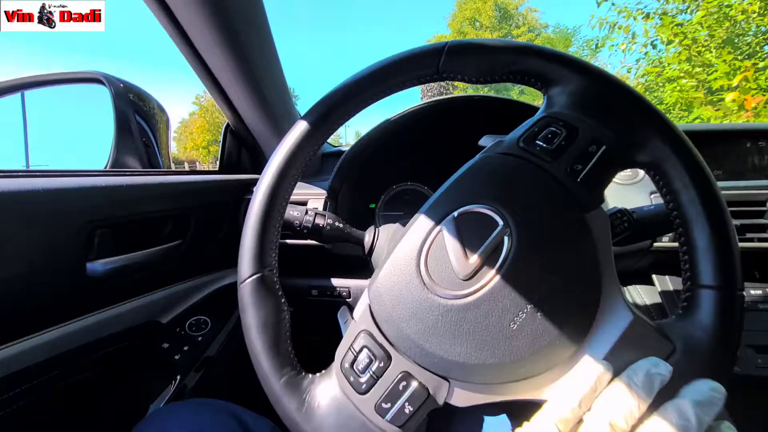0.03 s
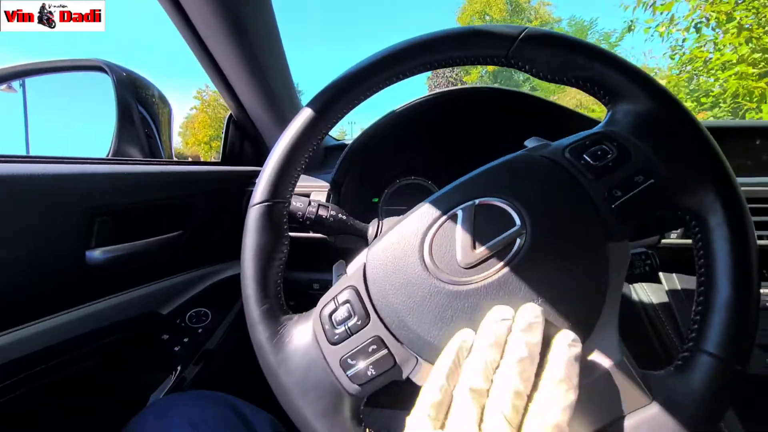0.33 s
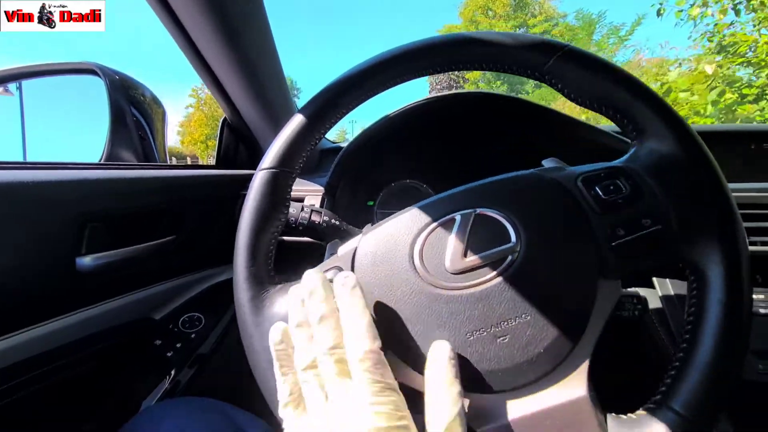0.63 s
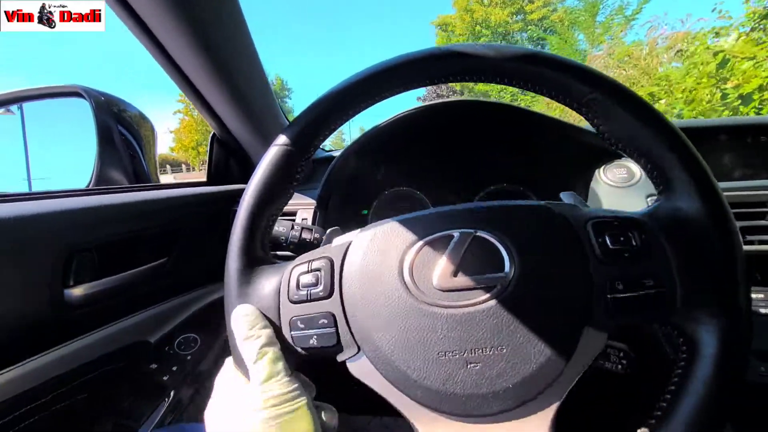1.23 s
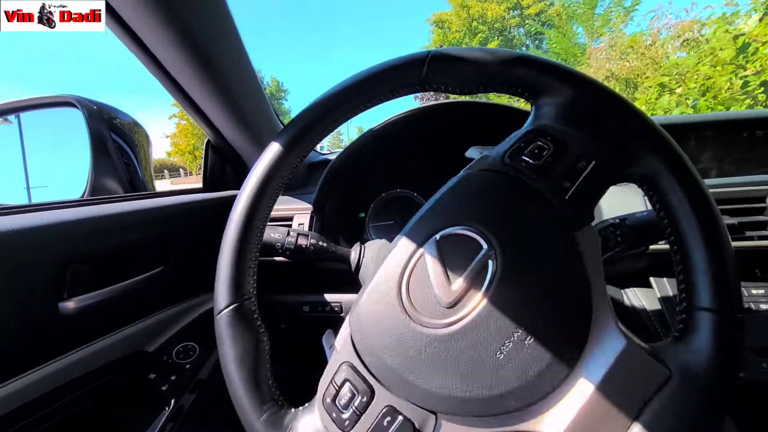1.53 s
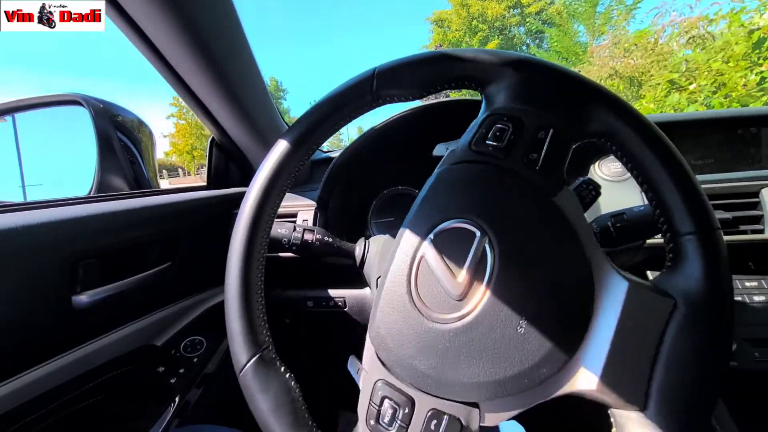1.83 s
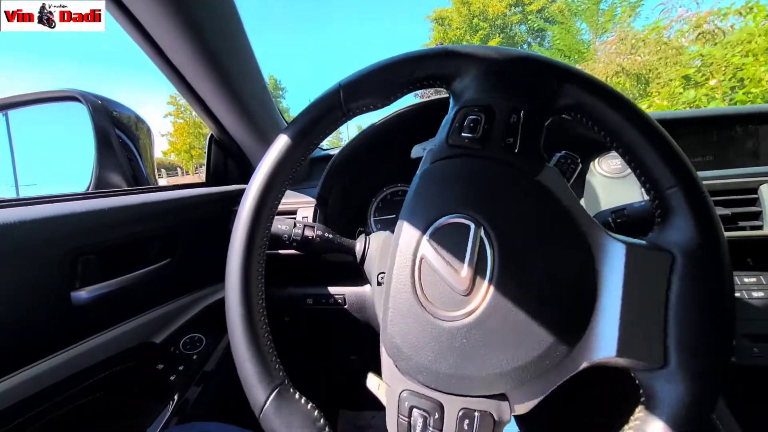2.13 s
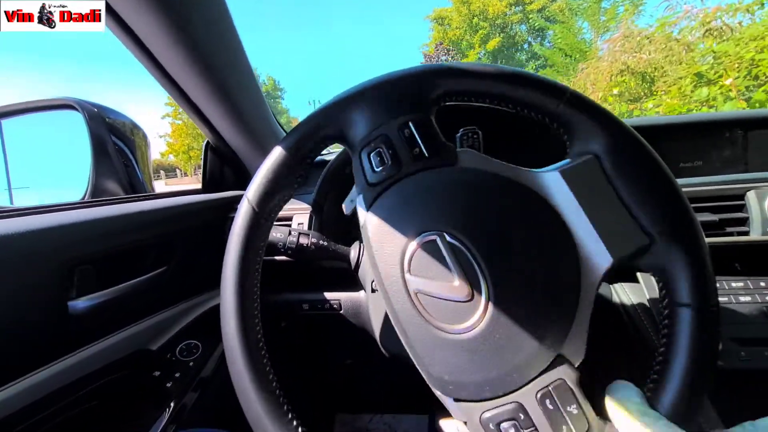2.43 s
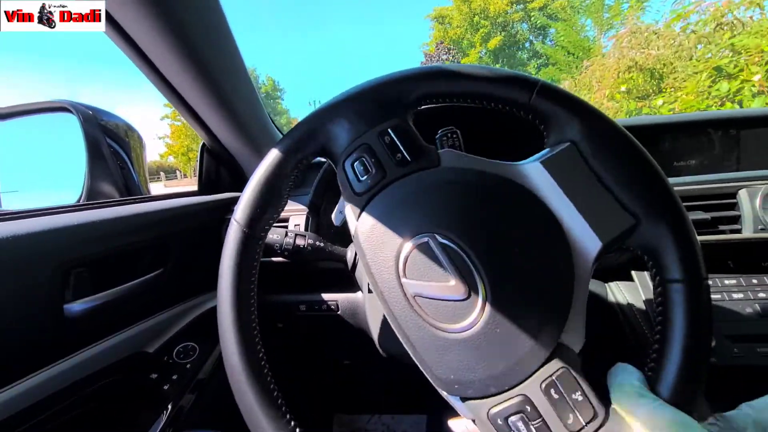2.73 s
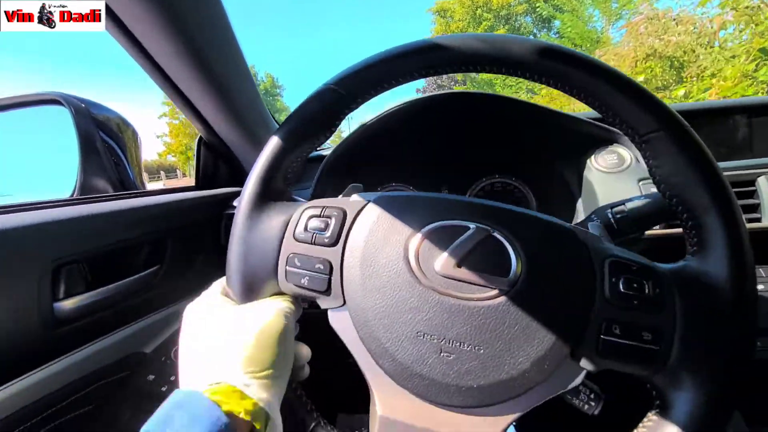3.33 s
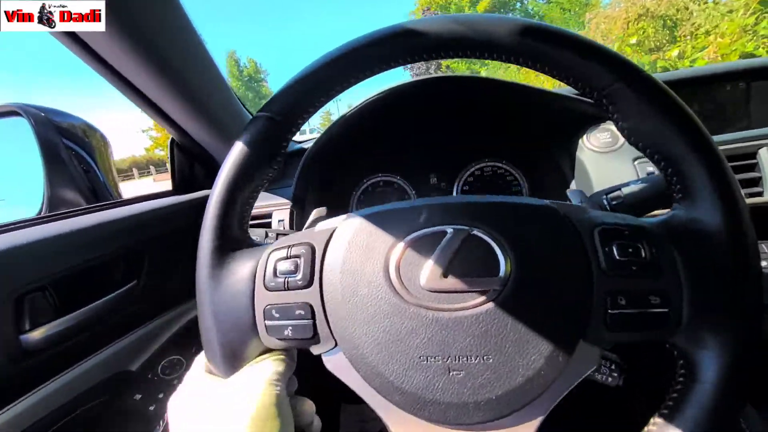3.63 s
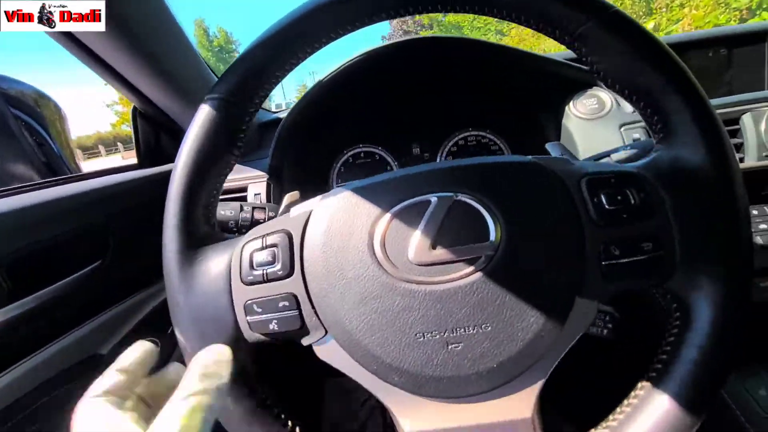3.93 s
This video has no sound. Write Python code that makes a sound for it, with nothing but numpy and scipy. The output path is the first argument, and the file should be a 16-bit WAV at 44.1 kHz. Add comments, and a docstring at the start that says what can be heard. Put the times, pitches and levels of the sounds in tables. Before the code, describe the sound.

A gloved palm rubs a steering wheel in short, soft swishes during the first second, with a low bump at the start. From about 1.3 seconds the rim slides through the glove in waves, with brief low steering groans. Around 3 seconds come a stronger slide, a tiny squeak and a tick, then a sharper click at 3.3. Low idling rumble and soft ventilation fill the car throughout.

```python
"""A gloved hand turns the steering wheel one way and back inside a closed, idling car.
Stick-slip friction makes the palm swish in short strokes, then the rim slide and squeak in the glove.
The steering bumps and groans; the column and trim tick and knock in quickly damped modes.
Underneath lie the engine's firing drone, the body's rumble and the rush and whine of the ventilation."""
import sys
import numpy as np
from scipy import signal
from scipy.fft import rfft, irfft
from scipy.io import wavfile
from scipy.ndimage import uniform_filter1d

SR = 44100
rng = np.random.default_rng(int(sys.argv[2]) if len(sys.argv) > 2 else 0)


def file_out(sig):
    """Save sig as 16-bit WAV at sys.argv[1]."""
    # one column per channel
    cols = np.atleast_2d(sig).T
    # limit, then scale
    lim = np.clip(cols, -1, 1)
    pcm = np.round(lim * 32767).astype(np.int16)
    wavfile.write(sys.argv[1], SR, pcm)


N = 176400
TIME_S, FREQ_HZ = np.arange(N) / SR, np.arange(N // 2 + 1) * SR / N
EARS = np.array([[1], [-1]])  # left, right

# Balance of the cabin's noise: frequency_hz, left_minus_right_db
CABIN_PAN = [(30,-4),(120,1),(350,0.5),(700,-3),(1300,-0.5),(2200,-3),(3000,-4),(4400,0),(8000,0),(15000,-11)]


def undb(db):
    """Decibels to amplitude ratio."""
    return 10 ** (np.asarray(db) / 20)


def unit(x):
    """Normalisation to rms 1."""
    return x / np.sqrt(np.mean(x ** 2))


def curve(rows):
    """Linear interpolation of (time_s, value) rows at every sample."""
    return np.interp(TIME_S, *np.array(rows).T)


def by_pitch(rows):
    """Interpolation of (frequency_hz, value) rows along log frequency."""
    hz, value = np.array(rows, float).T
    return np.interp(np.log(FREQ_HZ + 1), np.log(hz), value)


def phase_of(hz):
    """Phase is the time integral of frequency."""
    return 2 * np.pi * np.cumsum(hz) / SR


def walk(rate_hz):
    """Smoothed random steps of rms 1, for modulation."""
    step = int(SR / rate_hz)
    held = rng.standard_normal(N // 20)[np.arange(N) // step]
    return unit(uniform_filter1d(uniform_filter1d(held, step), step))


def swell(start, end, attack_s, release_s):
    """Amplitude envelope: a smooth rise near the start and fall near the end."""
    rise = 1 + np.tanh(2 * (TIME_S - start) / attack_s + 1)
    fall = 1 - np.tanh(2 * (TIME_S - end) / release_s - 1)
    return rise * fall / 4


def binaural(pair, spectrum, balance, lag_ms, diffuse_hz=600):
    """Interaural coherence: the ears share the bass, and the left lags in the treble; rms 1."""
    # Likeness of the two ears: frequency_hz, coherence
    likeness = [(30,0.8),(70,.95),(130,0.99),(280,0.77),(500,0.93),(900,0.17),(2000,0.33),(8000,0.02)]
    coherence = by_pitch(likeness)
    mid, side = rfft(pair)
    both = mid * np.sqrt(1 + coherence) + EARS * side * np.sqrt(1 - coherence)
    lag_s = lag_ms / 1000 * FREQ_HZ ** 2 / (FREQ_HZ ** 2 + diffuse_hz ** 2)
    delay = np.exp(-1j * np.pi * EARS * FREQ_HZ * lag_s)
    gain = undb(by_pitch(spectrum) + EARS * by_pitch(balance) / 2)
    return unit(irfft(both * delay * gain, N))


def engine(waver_db=2.16, pan_db=-1.1):
    """Periodic firing drives a fundamental and a booming second harmonic."""
    # Firing rate: time_s, rate_hz
    firing = [(0.0, 37.4), (0.11, 38.09), (0.67, 36.97), (0.86, 37.72), (1.34, 31.22), (1.59, 29.56),
              (1.71, 29.64), (2.15, 33.77), (2.91, 33.8), (3.25, 32.94), (3.61, 34.13), (4.0, 33.45)]
    # Fundamental and second harmonic: time_s, level_db
    fundamental = [(0,-38),(.35,-43),(.62,-30),(.9,-29.5),(1.15,-49),(1.75,-56),(1.95,-43.5),(3.1,-41),(3.6,-34),(4,-38)]
    boom = [(0,-47),(1.22,-43),(1.38,-39),(1.8,-37.5),(2.05,-49),(2.3,-40),(3,-36),(3.35,-41),(4,-39)]
    phase = phase_of(curve(firing))
    drone = sum(np.sqrt(2) * np.sin(harmonic * phase) * undb(curve(level) + waver_db * walk(18))
                for harmonic, level in enumerate((fundamental, boom), 1))
    return drone * undb(EARS * pan_db / 2)


def rumble():
    """The vibrating body radiates low-frequency noise into the cabin."""
    # Rumble spectrum: frequency_hz, relative_db
    spectrum = [(10,-21),(20,-1),(28,-2),(48,0),(70,-6),(85,-11.5),(125,-12.5),(160,-16.5),(195,-13),(250,-20),(330,-18),(420,-27),(700,-33),(900,-45),(2000,-88)]
    # Rumble strength: time_s, level_db
    level = [(0,-37),(.15,-35),(.35,-37.5),(.6,-37.5),(.9,-37.5),(1.2,-39),(2.5,-39),(4,-40.5)]
    return binaural(rng.standard_normal((2, N)), spectrum, CABIN_PAN, lag_ms=0.32) * undb(curve(level))


def ventilation(growth_db_per_s=2.0):
    """Turbulent air gives broadband noise; the blower adds a thin, growing tonal whine."""
    # Air spectrum: frequency_hz, relative_db
    spectrum = [(100,-2),(300,-1),(520,-1.5),(760,-4),(880,-10),(1060,-10),(1300,-4),(1800,-8.5),(2250,-16),(2900,-14.5),(4000,-18.5),(4700,-24),(8000,-28.5),(10000,-43),(15500,-46)]
    # Air strength: time_s, level_db
    level = [(0,-51),(1.1,-48.5),(2.1,-49.5),(2.7,-50),(3.4,-51.5),(4,-50.5)]
    # Blower tones: pitch_hz, final_level_db
    tones = [(309,-57.5),(935,-72)]
    air = binaural(rng.standard_normal((2, N)), spectrum, CABIN_PAN, lag_ms=0.49)
    air *= undb(curve(level) + .4 * walk(16))
    whine = 0
    for hz, db in tones:
        amplitude = np.sqrt(2) * undb(db + 1.55 * walk(6))
        whine += amplitude * np.sin(phase_of(hz * (1 + 0.00191 * walk(8))))
    return air + whine * undb(growth_db_per_s * (TIME_S - N / SR))


def wander(pair, depth_db=2.3, life_s=.08, width_hz=300):
    """Narrow resonances come and go as the hand changes shape."""
    spectra = signal.stft(pair, nperseg=512)[2]
    span = (1, round(width_hz * 512 / SR), round(life_s * SR / 256))
    patches = signal.fftconvolve(rng.standard_normal(spectra.shape), np.ones(span), mode="same")
    return signal.istft(spectra * undb(depth_db * unit(patches)), nperseg=512)[1][:, :N]


def friction(spectrum, grain, slips_per_s=5000, spread_db=2.6):
    """Stick-slip friction: dense tiny slips over a hiss, fluttering with the hand's pressure."""
    # Balance of the hand's noise: frequency_hz, left_minus_right_db
    balance = [(300,5),(750,0),(1200,-2.5),(1600,-12),(2200,2),(3000,-3.5),(4500,-2.5),(6500,3.5),(9000,3),(11500,1),(14000,8.5)]
    sizes = undb(spread_db * np.minimum(rng.exponential(size=N), 6))
    slips = (rng.random(N) < slips_per_s / SR) * sizes * rng.standard_normal((2, N))
    contact = wander(rng.standard_normal((2, N)) + grain * unit(slips))
    flutter = undb(.7 * walk(180))
    return binaural(contact, spectrum, balance, lag_ms=0.249) * flutter


def palm(pivot_hz=6000, half_width_octaves=0.065, arch_db=3.5):
    """Cavity resonance: the hollow of the hand colours each bright swish of friction anew."""
    # Glove on the wheel: frequency_hz, relative_db
    spectrum = [(400,-33),(700,-5),(1000,-11),(1500,-8.5),(2300,-1),(3100,4),(4500,-1.5),(5400,-1),(6500,-2.5),(8500,-2),(10000,-5.5),(12000,-5.5),(15500,-8)]
    # Palm strokes: start_s, end_s, level_db, tilt_db_per_octave, resonance_hz, lift_db
    strokes = [(-.05,0.038,-52.5,4,3570,10),(.062,0.143,-45,1,3430,6),(0.138,0.182,-49,0,3900,6.5),(0.179,0.246,-49.5,-1.5,3240,1.5),(0.333,0.41,-56,-3.5,3200,-2),(0.396,.475,-50,5,4000,9),(0.654,0.741,-47,2,2970,4),(0.773,0.852,-55.5,2,6600,10.5),(0.86,0.965,-56,0,7600,8),(3.1,3.135,-53.5,-4.5,3197,1)]
    rub, out = rfft(friction(spectrum, grain=0.68)), 0
    freq = np.maximum(FREQ_HZ, 500)  # the tilt levels off in the bass
    for start, end, db, tilt, hz, lift in strokes:
        resonance_db = lift / (1 + (np.log2(freq / hz) / half_width_octaves) ** 2)
        swish = irfft(rub * undb(db + tilt * np.log2(freq / pivot_hz) + resonance_db), N)
        progress = np.clip((TIME_S - start) / (end - start), 0, 1)
        arch = undb(arch_db * (np.sin(np.pi * progress) - .5))  # loudest in mid-stroke
        out += swish * arch * swell(start, end, attack_s=0.021, release_s=0.032)
    return out


def rim():
    """Sliding friction: the rim hisses in the glove, dull under a tight grip, bright at fingertips."""
    # Sliding, louder as the wheel turns faster: time_s, level_db
    slide_level = [(0,-51.5),(.55,-64),(.85,-53.5),(1.03,-60.5),(1.22,-62.5),(1.42,-51.5),(1.58,-52),(1.68,-57.5),(1.88,-53.5),(2.02,-61),(2.25,-52.5),(2.48,-53.5),(2.63,-64),(2.85,-48),(3.06,-52),(3.16,-54.5),(3.3,-65),(3.76,-65),(3.86,-51),(4,-59.5)]
    # Tight grips and fingertip brushes: start_s, end_s, level_db
    grips = [(0.062,0.09,-50.5),(1.302,1.846,-60.5),(2.22,2.503,-54.5),(2.792,2.948,-48.5)]
    brushes = [(1.44,1.56,-67),(1.53,1.62,-61.5),(1.575,1.593,-59),(3.012,3.025,-52.5)]
    # Spectrum of each contact: frequency_hz, relative_db
    slide_spectrum = [(300,-7),(700,-0.5),(1000,-1.5),(1400,-4.5),(1900,5),(2400,1.5),(3300,0.5),(4600,-5.5),(6500,-4),(8500,-6.5),(10000,-12),(15500,-17.5)]
    grip_spectrum = [(300,-2.5),(700,-2.5),(1000,-3.5),(1300,3.5),(1800,-4.5),(2300,-7.5),(3000,-15),(5000,-30.5),(15000,-32)]
    brush_spectrum = [(2000,-25),(6000,-3),(10000,0),(13000,-6),(15500,-3)]
    grip = sum(undb(db) * swell(start, end, .07, 0.035) for start, end, db in grips)
    brush = sum(undb(db) * swell(start, end, 0.017, 0.012) for start, end, db in brushes)
    return (undb(curve(slide_level)) * friction(slide_spectrum, grain=0.31)
            + grip * friction(grip_spectrum, grain=1.0)
            + brush * friction(brush_spectrum, grain=.8))


def steering():
    """Low vibrations glide downward: bumps as the palm pushes, groans as the wheel reverses."""
    # Bumps and groans: start_s, end_s, pitch_hz, glide_octaves_per_s, level_db
    groans = [(0.072,0.091,47.7,-4,-28.5),(0.116,0.22,71.8,-0.5,-39),(1.236,1.31,196,-0.2,-45.5),(1.623,1.668,143,-4.5,-38.5),(1.63,1.671,101,-4.5,-38),(1.593,1.64,250,-5,-48.5)]
    out = 0
    for start, end, hz, glide, db in groans:
        phase = phase_of(hz * 2 ** (glide * np.clip(TIME_S - start, 0, end - start)))
        tone = np.sqrt(2) * np.sin(phase - np.interp(start, TIME_S, phase))
        out += tone * undb(db) * swell(start, end, attack_s=0.0064, release_s=0.021)
    return out


def ticks(pivot_hz=2000):
    """Modal ringing: small impacts in the plastic column and trim excite damped sinusoids."""
    # Impacts: start_s, level_db, left_minus_right_db, tilt_db_per_octave
    impacts = [(.469,-43.5,-3,-5),(1.249,-47.5,-2,-7),(1.84,-43,-9,2),(2.489,-47.5,-9,-10.5),(3.003,-38.5,-8,-1),(3.3126,-33.5,4,-2),(3.456,-46.5,-17,-8)]
    # Modes of the plastic: pitch_hz, relative_db, t60_s
    modes = [(620,-7.5,0.014),(1060,-7.5,0.007),(1633,-6.5,0.02),(2750,-1,0.0046),(3400,-4,0.0064),(3906,-18,0.01),(5500,-10.5,0.0063)]
    out = np.zeros((2, N))
    for start, db, pan_db, tilt in impacts:
        age = np.maximum(TIME_S - start, 0)
        for k, (hz, mode_db, t60) in enumerate(modes):
            decay = np.exp(-np.minimum(np.log(1000) * age / t60, 20))
            ring = (-1) ** k * np.sin(2 * np.pi * hz * age) * decay
            out += ring * undb(db + mode_db + tilt * np.log2(hz / pivot_hz) + EARS * pan_db / 2)
    return reflect(out, gain=0.43, t60_s=.06)


def reflect(pair, gain, t60_s):
    """Early reflections from the dashboard and windows differ at each ear."""
    tail = rng.standard_normal((2, N // 20)) * np.exp(-np.log(1000) * TIME_S[:N // 20] / t60_s)
    tail *= gain / np.sqrt(np.sum(tail ** 2) / 2)
    return pair + signal.fftconvolve(pair, tail, axes=1)[:, :N]


def squeaks(waver=0.019, pan_db=-5):
    """Stick-slip oscillation: the rubber glove catches on the rim in a brief, unsteady tone."""
    # Catches of the rubber: start_s, end_s, pitch_hz, level_db
    catches = [(2.955,2.986,3810,-62),(2.996,3.01,3960,-56.5)]
    out = 0
    for start, end, hz, db in catches:
        tone = np.sqrt(2) * np.sin(phase_of(hz * (1 + waver * walk(600))))
        out += tone * undb(db) * swell(start, end, attack_s=0.0043, release_s=0.0038)
    return out * undb(EARS * pan_db / 2)


def scene():
    """Superposition of all sources at the driver's seat."""
    return engine() + rumble() + ventilation() + palm() + rim() + steering() + ticks() + squeaks()


def record(dry, cutoff_hz=15650):
    """An elliptic low-pass filter cuts the top treble steeply."""
    return signal.sosfilt(signal.ellip(10, .2, 80, cutoff_hz, fs=SR, output="sos"), dry)


dry = scene()
out = record(dry)
file_out(out)
```